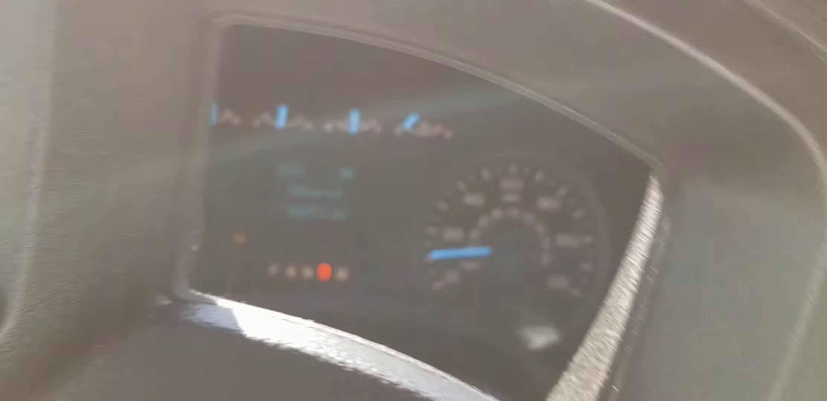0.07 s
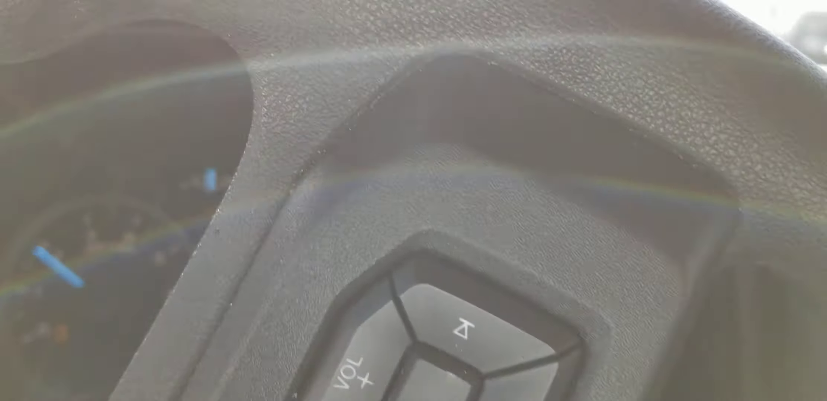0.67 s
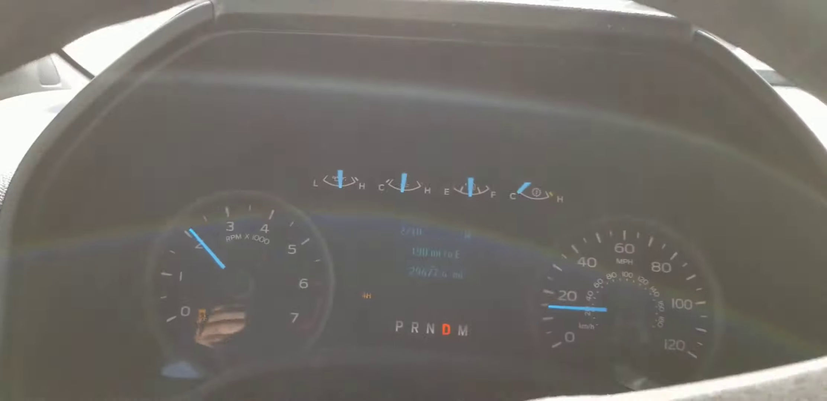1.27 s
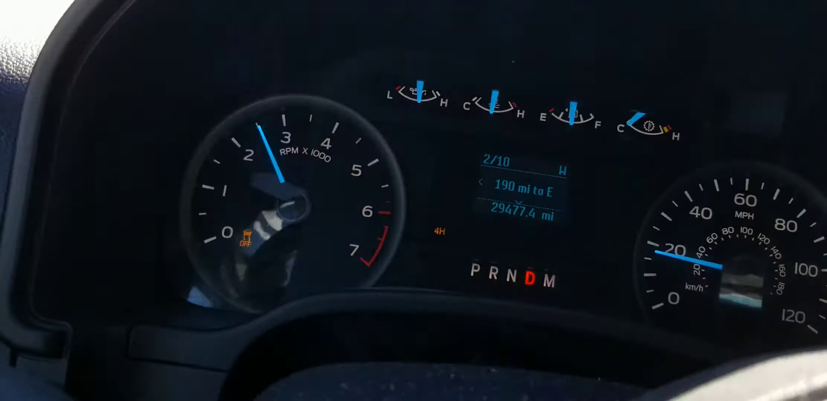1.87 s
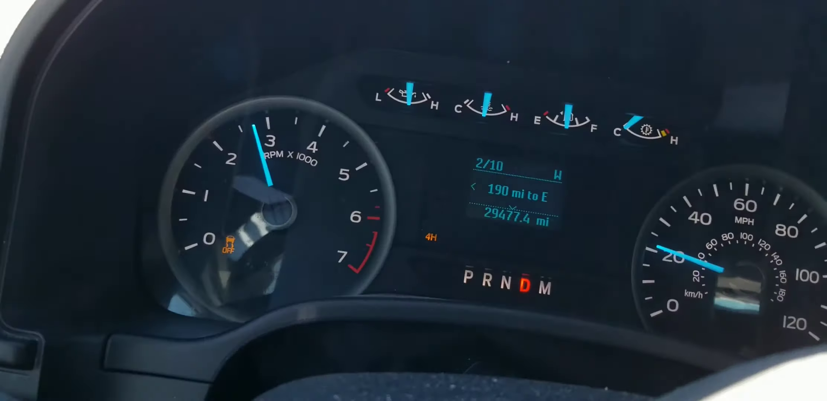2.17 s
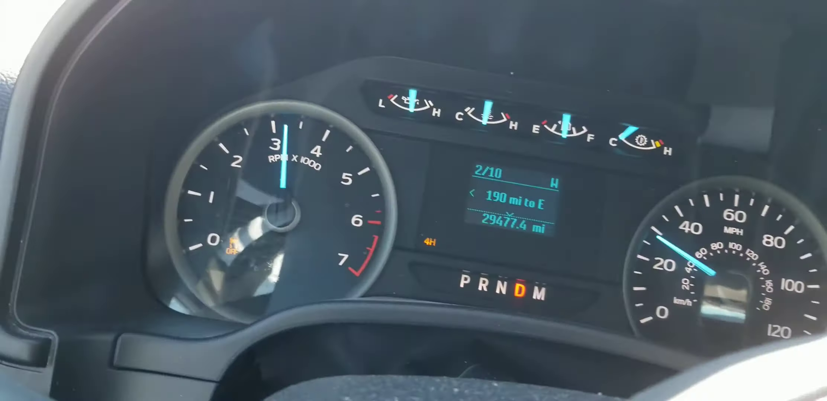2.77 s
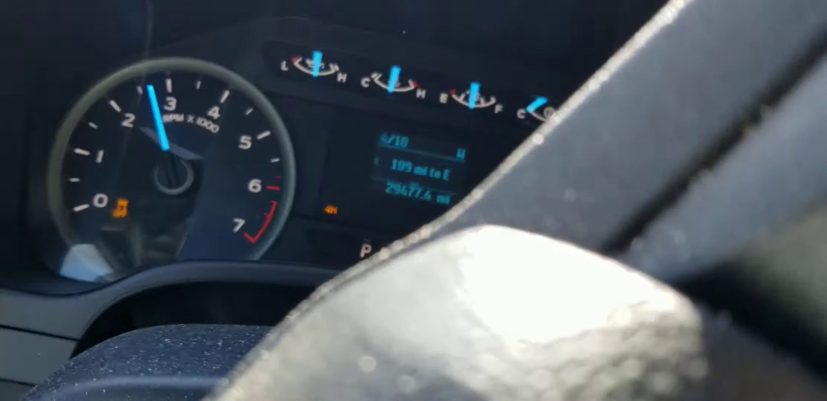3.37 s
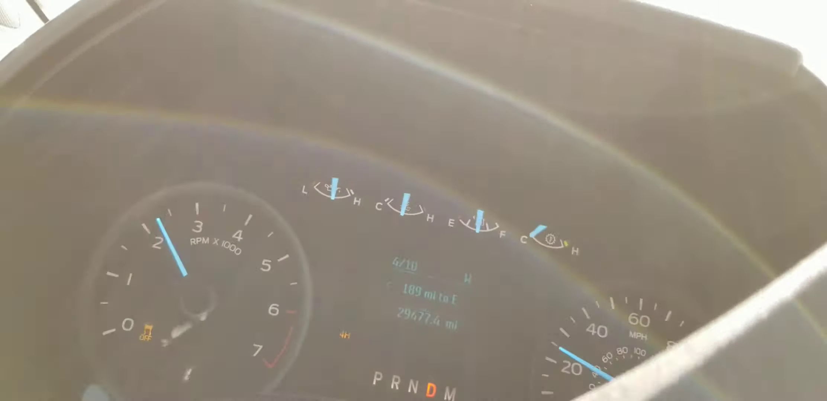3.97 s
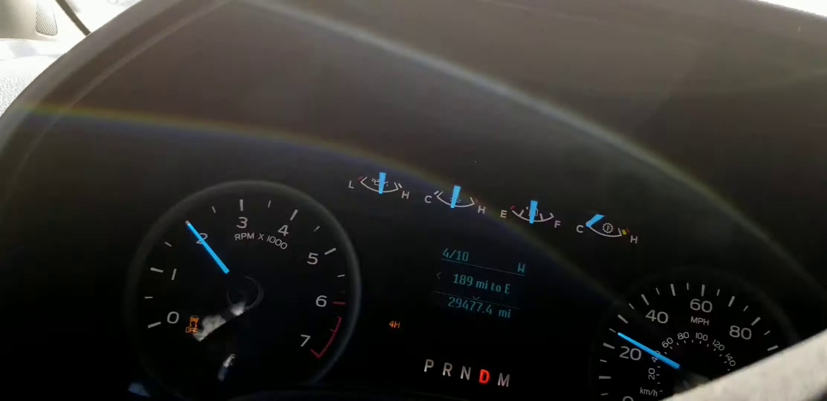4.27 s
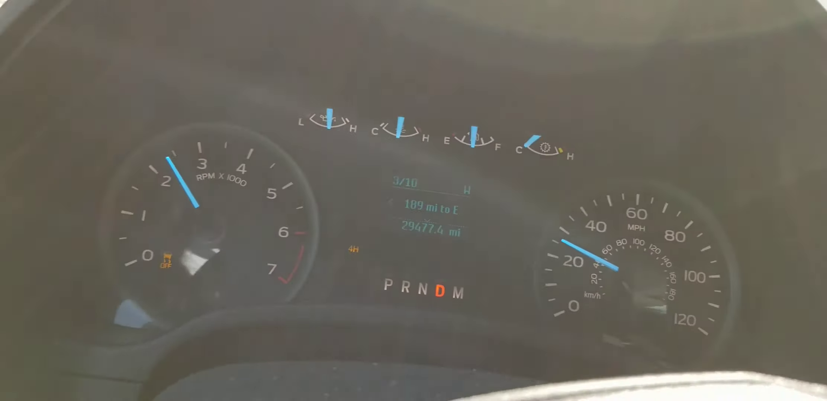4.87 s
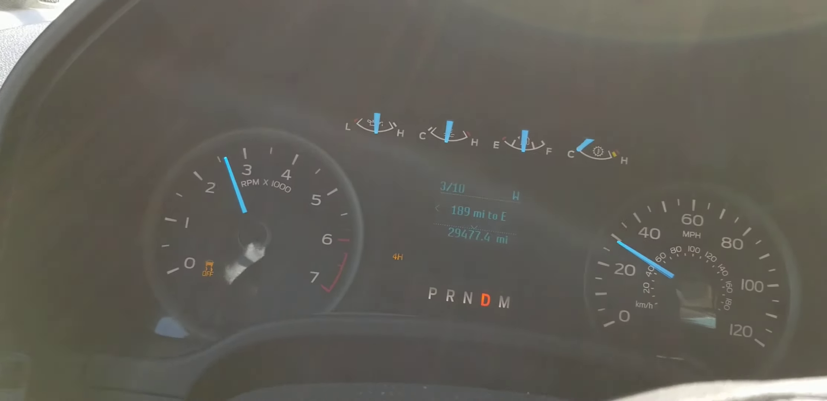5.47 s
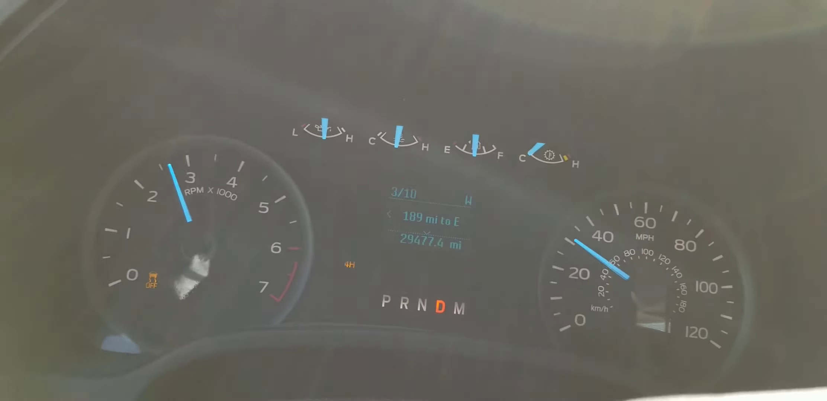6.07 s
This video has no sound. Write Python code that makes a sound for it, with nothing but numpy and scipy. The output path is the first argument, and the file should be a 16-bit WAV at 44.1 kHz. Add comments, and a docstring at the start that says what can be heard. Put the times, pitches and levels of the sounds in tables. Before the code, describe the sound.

A V8 pickup is heard from the driver's seat, its deep drone and low tyre rumble filling the cab over a faint, steady air hiss. For the first 1.5 seconds the power steering whirrs softly and a hand slides over the wheel in light, gritty swishes, strongest around 1.3 seconds, with a few sharp little plastic ticks. The engine climbs about an octave, growing more growly until 2.7 seconds. It then eases off amid a cluster of small ticks and shifts up with a soft knock at 3 seconds. The note sinks and quietens until about 4 seconds, pulls upward again to 5.5, and relaxes slightly by 6. Dull, low bumps come near 1.9, 2.3, 3, 4.2 and 4.8 seconds, the heaviest at 2.3, where the road rumble swells. Another brief hand swish passes at about 5 seconds.

```python
"""A V8 drones and climbs, heard inside a pickup pulling out of a turn. It eases off at three seconds,
shifts up with a soft knock and pulls again. Eight firings a cycle give the note; uneven banks add boom
and growl. Tyres rumble through the cab and thump over bumps; air hisses steadily. The power steering
whirrs as the wheel slides back through the driver's hand with soft swishes and small ticks."""
import sys
import numpy as np
from scipy import signal
from scipy.fft import rfft, irfft, next_fast_len
from scipy.io import wavfile
from scipy.ndimage import uniform_filter1d, map_coordinates

SR = 44100
rng = np.random.default_rng(int(sys.argv[2]) if len(sys.argv) > 2 else 0)


def persist_wave(psi):
    """Save psi, clipped to +-1, as 16-bit WAV."""
    counts = np.round(np.clip(psi, -1, 1) * 32767).astype(np.int16)
    wavfile.write(sys.argv[1], SR, np.atleast_2d(counts).T)


N = 269892

# Cab and panel resonances. Each row: centre in Hz, width in Hz, height in dB.
CAB_RESONANCES = [(293, 24, 2), (344, 24, 1), (556, 39, 4.5), (776, 24, 0), (1110, 13, 2), (1383, 47, 3.5),
                  (1680, 42, 3), (2170, 160, 1.5), (2790, 93, 1), (3100, 70, 3), (3480, 280, 2)]
HAND_LEAN_DB = 0.5  # left minus right


def amp(db):
    """Decibels to gain."""
    return 10 ** (np.asarray(db) / 20)


def unit(x):
    """Scale to rms 1."""
    return x / np.sqrt(np.mean(x ** 2) + 1e-20)


def along(points, hz):
    """Read (Hz, value) points on a log axis."""
    knots_hz, values = np.transpose(points)
    return np.interp(np.log(hz + 1), np.log(knots_hz + 1), values)


def curve(points):
    """Read (seconds, value) points at every sample."""
    return np.interp(np.arange(N) / SR, *np.transpose(points))


def swell_at(mid_s, half_s):
    """Gaussian rise and fall of height 1."""
    return np.exp(-((np.arange(N) / SR - mid_s) / half_s) ** 2)


def bells(modes, hz):
    """Sum of resonance peaks."""
    return sum(height / (1 + (2 * (hz - centre) / width) ** 2) for centre, width, height in modes)


def wobble(rate_hz):
    """Smooth random curve, rate_hz knots a second."""
    coarse = np.arange(0, N + 16, 16)
    knots = rng.standard_normal(int(N * rate_hz / SR) + 4)
    return np.interp(np.arange(N), coarse, map_coordinates(knots, [coarse * rate_hz / SR]))


def filtered(x, response):
    """Apply a gain given as a function of Hz."""
    size = next_fast_len(N + SR // 2)
    return irfft(rfft(x, size) * response(np.fft.rfftfreq(size, 1 / SR)), size)[..., :N]


def panned(lean_db):
    """Stereo gains for a left-minus-right level."""
    return amp(np.array([[1], [-1]]) * lean_db / 2)


def hiss(spectrum):
    """Coloured noise of rms 1, independent in each channel."""
    return unit(filtered(rng.standard_normal((2, N)), lambda hz: amp(along(spectrum, hz))))


def patchy(depth_db):
    """Two noises whose narrow bands fade in and out, as when moving through standing waves."""
    bands = signal.stft(rng.standard_normal((2, N)), nperseg=2048)[2]
    fading = uniform_filter1d(rng.standard_normal(bands.shape), size=4, axis=1)
    fading = uniform_filter1d(fading, size=18, axis=2)
    return signal.istft(bands * amp(depth_db * unit(fading)), nperseg=2048)[1][:, :N]


def cab_noise(spectrum, patchy_db):
    """Noise filling the cab: bass alike on both sides, treble diffuse; mostly louder on the right."""
    # Likeness of the sides. Each row: frequency in Hz, left-right correlation.
    likeness = [(60, 0.99), (130, 1), (250, 0.62), (640, 0.76), (1400, 0.14), (3000, -0.033),
                (15000, 0.0034)]
    # Balance. Each row: frequency in Hz, left minus right in dB.
    lean = [(110, 0), (190, 4.5), (330, -3), (700, -3.5), (1300, -4.5), (2400, -5), (4400, -7.5),
            (8100, -6), (14000, 1)]
    left_lag_s = 0.000373
    size = next_fast_len(N)
    hz = np.fft.rfftfreq(size, 1 / SR)
    colour = amp(along(spectrum, hz) + bells(CAB_RESONANCES, hz))
    common, diffuse = rfft(patchy(patchy_db), size) * colour
    spread_rad = np.arccos(np.clip(along(likeness, hz), -1, 1)) / 2
    mid, side = common * np.cos(spread_rad), diffuse * np.sin(spread_rad)
    pair = np.array([(mid + side) * np.exp(-2j * np.pi * hz * left_lag_s), mid - side])
    return unit(irfft(pair * panned(along(lean, hz)), size)[:, :N])


def air():
    """Steady hiss of moving air."""
    # Each row: frequency in Hz, relative density in dB.
    spectrum = [(500, -12.5), (1200, -0.5), (2000, 0), (3000, -5), (4500, -9), (6200, -10), (6800, -14.5),
                (8000, -13.5), (9200, -19), (11000, -15), (13000, -13.5), (16000, -12)]
    # Each row: time in seconds, level in dB.
    level = [(0, -48), (.7, -47), (1.5, -47.5), (2.3, -50.5), (3.2, -48.5), (4.25, -49.5), (5.1, -47.5),
             (6.12, -48.5)]
    return amp(curve(level)) * cab_noise(spectrum, patchy_db=3.0)


def road():
    """Low rumble through the suspension; tyre roar ringing in the cab."""
    # Each row of both: frequency in Hz, relative density in dB.
    rumble_spectrum = [(18, -12), (27, -10.5), (37, -6.5), (48, -8), (60, 2.5), (80, -7.5), (115, -6.5),
                       (160, -16), (220, -21), (400, -45), (1000, -120)]
    roar_spectrum = [(20, -50), (80, -25), (180, -2), (250, -2), (320, -2.5), (480, -1), (570, -3.5),
                     (690, -7.5), (1000, -10), (1400, -13.5), (2200, -22.5), (5000, -46), (9000, -90)]
    rough_stretch_db = 3 * swell_at(mid_s=2.22, half_s=0.72)
    rumble = amp(-26 + rough_stretch_db + 0.69 * wobble(4.02)) * cab_noise(rumble_spectrum, patchy_db=0)
    roar = amp(-40 + 1.2 * wobble(8)) * cab_noise(roar_spectrum, patchy_db=2)
    return rumble + roar


def bumps():
    """Each bump swells a low cab resonance for a few cycles."""
    # Each row: start in seconds, peak in dB, frequency in Hz, length in seconds.
    thumps = [(1.855, -16, 37.32, .16), (2.278, -11.5, 57.77, 0.12), (3.043, -18, 53, 0.14),
              (4.159, -14, 53.9, 0.19), (4.841, -19, 62.3, 0.15)]
    out = np.zeros(N)
    for start_s, db, hz, length_s in thumps:
        t = np.arange(N) / SR - start_s
        envelope = np.sin(np.pi * np.clip(t / length_s, 0, 1)) ** 2
        out += amp(db) * envelope * np.sin(2 * np.pi * (hz * t + rng.random()))
    return out


def steering():
    """Power steering whirrs in three noise bands, swelling as the wheel turns fastest."""
    # Each row: middle in seconds, level in dB, half-length in seconds.
    swells = [(.45, -50, 0.27), (.98, -44, 0.14), (1.4, -57, 0.18)]
    # Each row: centre in Hz, width in Hz, relative amplitude.
    bands = [(610, 130, 0.63), (1670, 130, 0.18), (2730, 450, 0.12)]
    effort = sum(amp(db) * swell_at(mid_s, half_s) for mid_s, db, half_s in swells)
    whirr = filtered(rng.standard_normal((2, N)), lambda hz: bells(bands, hz))
    return effort * unit(whirr)


def hand():
    """Skin slides over the grained rim: a fine gritty swish over a coarser rasp."""
    # Each row: middle in seconds, swish level in dB, half-length in seconds.
    strokes = [(0.055, -51.5, 0.15), (0.298, -50, 0.08), (0.51, -53, 0.14), (.9, -52.5, 0.13),
               (1.16, -52, .1), (1.303, -41.5, 0.056), (1.382, -38.5, 0.048), (1.548, -55, .06),
               (2.62, -58, 0.12), (3.17, -52.5, .08), (4.7, -54, .08), (5.06, -46.5, .055),
               (5.354, -56, .06)]
    # Each row of both: frequency in Hz, relative density in dB.
    swish_spectrum = [(3000, -70), (8000, -18), (10000, -12.5), (11500, -2.5), (13000, 2.5), (15800, 1.5)]
    rasp_spectrum = [(500, -50), (2500, -1), (5000, -3), (8000, 6.5), (9500, 1.5), (12000, -9),
                     (16000, -25)]
    soft_stroke_db = -55.5
    swish, rasp, out = hiss(swish_spectrum), hiss(rasp_spectrum), np.zeros((2, N))
    for mid_s, db, half_s in strokes:
        rasp_db = soft_stroke_db - 7 + 0.62 * (db - soft_stroke_db)  # grows more slowly than the swish
        out += swell_at(mid_s, half_s) * (amp(db) * swish + amp(rasp_db) * rasp)
    grit = amp(1.4 * wobble(500))
    return out * grit * panned(HAND_LEAN_DB)


def ticks():
    """The wheel's plastic trim snaps: a bright click and a lower body, gone in milliseconds."""
    # Each row: start in seconds, click level in dB, body relative to click in dB.
    snaps = [(1.106, -36, -6), (1.139, -36, -9), (1.393, -30.5, -12), (2.026, -41.5, -17),
             (2.187, -46, -13), (2.69, -39, -5), (2.742, -40, -3), (2.767, -45, -3), (2.858, -39, -5),
             (2.901, -44, -3), (2.967, -40.5, 5.5), (3.94, -44, -2), (6.031, -43, -16)]
    # Each row of both: frequency in Hz, relative density in dB.
    click_spectrum = [(2000, -70), (6000, -12), (10000, -10), (13000, -3.5), (16000, -1.5)]
    body_spectrum = [(200, -40), (700, 9), (1500, 10.5), (3000, 3), (5000, -3), (7800, -5.5), (10000, -19),
                     (15000, -25)]
    click, body, out = hiss(click_spectrum), hiss(body_spectrum), np.zeros((2, N))
    attack_s, decay_s, tail_s = 0.0007, 0.0031, 0.014
    t = np.arange(SR // 20) / SR
    envelope = (1 - np.exp(-t / attack_s)) * (np.exp(-t / decay_s) + 0.093 * np.exp(-t / tail_s))
    envelope /= envelope.max()
    faint = [(start_s, -47, -15) for start_s in rng.uniform(2.5, 3.1, size=6)]  # the grip shifts
    for start_s, db, body_db in snaps + faint:
        span = round(start_s * SR) + np.arange(len(t))
        out[:, span] += amp(db) * envelope * (click[:, span] + amp(body_db) * body[:, span])
    return out * panned(HAND_LEAN_DB)


def gear_knock():
    """The upshift rings the cab's lowest panel resonances."""
    panels = unit(filtered(rng.standard_normal(N), lambda hz: bells(CAB_RESONANCES[:3], hz)))
    return amp(-39.5) * swell_at(mid_s=2.99, half_s=0.019) * panels


def engine_order(cycles, order, waver_db, drift_rad):
    """One multiple of the cycle rate, unsteady as combustion varies."""
    phase = 2 * np.pi * (order * cycles + rng.random()) + drift_rad * wobble(12)
    return unit(np.sin(phase) * amp(waver_db * wobble(14)))


def engine():
    """Eight firings a cycle give the note; uneven banks add orders 3 and 5 and a rough growl."""
    # Each row: time in seconds, four-stroke cycle rate in Hz.
    speed = [(0, 13.5), (.2, 16), (.7, 16.1), (1.08, 18.4), (1.35, 18.7), (1.55, 20.7), (1.9, 22.3),
             (2.1, 25), (2.3, 26.9), (2.7, 28), (3, 22.9), (3.6, 20.2), (3.87, 16.7), (4.05, 16),
             (4.23, 18.3), (4.78, 20.9), (5.55, 23.4), (6.12, 20.7)]
    # The driver lifts off for the upshift and at the end. Each row: time in seconds, load in dB.
    load = [(0, -0.5), (.5, 0), (1.3, 2), (2.1, -1), (2.68, 1), (2.8, -5.5), (3, -3.5), (3.2, -12),
            (3.7, -8), (4.2, -0.5), (4.55, -3), (5.45, 1), (6.12, -5.5)]
    # Cab response to a strong order. Each row: frequency in Hz, level at 0 dB load in dB.
    cab_boom = [(44, -62), (51, -32.5), (62, -26), (80, -27.5), (96, -28), (117, -34.5), (131, -26),
                (147, -35), (188, -31.5), (222, -38.5)]
    # Uneven firing of the banks. Each row: order, relative level in dB.
    weak_orders = [(4, -4), (6, -4), (7, 0), (9, -15), (10, -10.5), (11, -10.5), (13, -17.5), (16, -13.5)]
    cruise_hz, growl_db_per_octave = 20, 5.5
    cycle_hz, load_db = curve(speed), curve(load)
    cycles = np.cumsum(cycle_hz) / SR

    def strong_order(order, load_share, waver_db, drift_rad):
        level_db = load_share * load_db + along(cab_boom, order * cycle_hz)
        return amp(level_db) * engine_order(cycles, order, waver_db, drift_rad)

    boom = amp(0.5) * strong_order(3, load_share=0.5, waver_db=2.0, drift_rad=0.35)
    drone = strong_order(5, load_share=1, waver_db=1.6, drift_rad=0.23)
    firing = strong_order(8, load_share=1, waver_db=1.9, drift_rad=0.21)
    weak = np.zeros(N)
    for order, db in weak_orders:
        resonance_db = 3.2 * bells(CAB_RESONANCES[:3], order * cycle_hz)
        weak += amp(db + resonance_db) * engine_order(cycles, order, waver_db=2.5, drift_rad=0.62)
    # Intake and block noise, one puff per firing. Each row: frequency in Hz, relative density in dB.
    puff_spectrum = [(30, -70), (100, -20), (190, 1.5), (245, -0.5), (300, 0.5), (440, -7), (590, -4.5),
                     (760, -9), (950, -11), (1200, -14.5), (1600, -29.5), (4000, -40.5), (9000, -90)]
    puffs = unit(cab_noise(puff_spectrum, patchy_db=2.0) * (1 + 0.3 * np.cos(2 * np.pi * cycles * 8)))
    growl_db = -38.5 + growl_db_per_octave * np.log2(cycle_hz / cruise_hz) + 0.6 * load_db
    return boom + drone + firing + amp(growl_db) * (amp(-1.5) * weak + puffs)


def scene():
    """Everything heard from the driver's seat."""
    return engine() + road() + bumps() + gear_knock() + air() + steering() + hand() + ticks()


def record(dry):
    """Roll off the deepest bass; cut the highest treble."""
    low_hz, top_hz = 18, 15850
    return filtered(dry, lambda hz: (hz < top_hz) * (1 - np.exp(-(hz / low_hz) ** 2)))


dry = scene()
out = record(dry)
persist_wave(out)
```